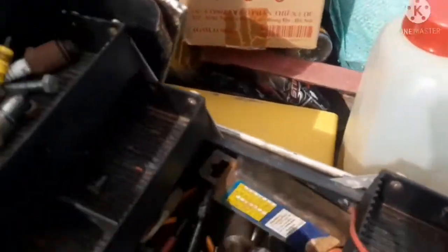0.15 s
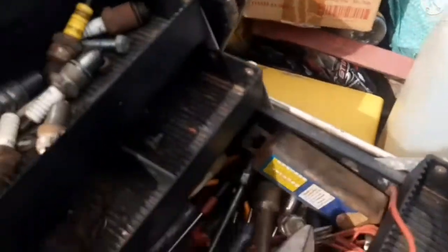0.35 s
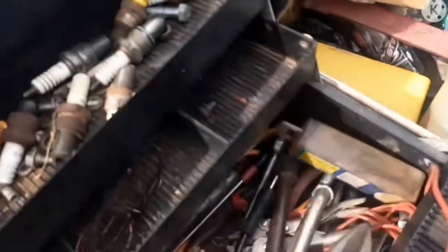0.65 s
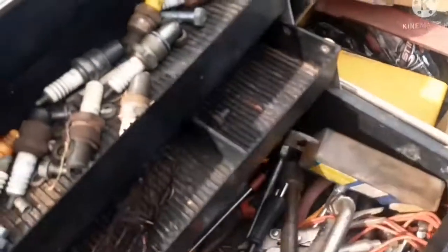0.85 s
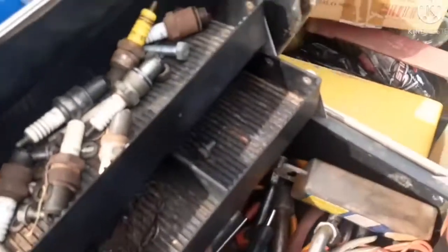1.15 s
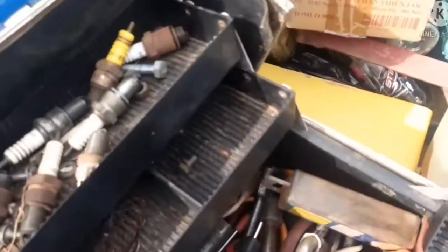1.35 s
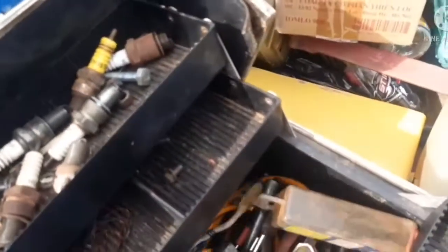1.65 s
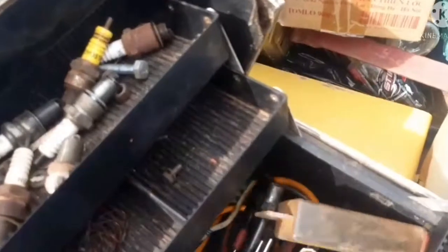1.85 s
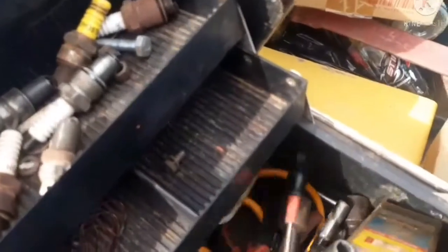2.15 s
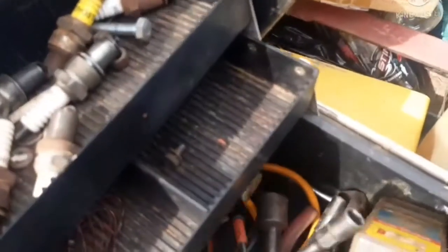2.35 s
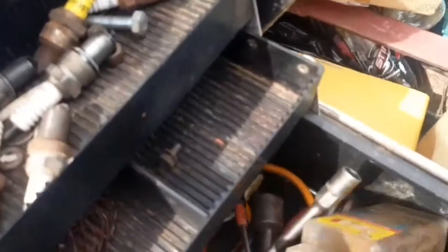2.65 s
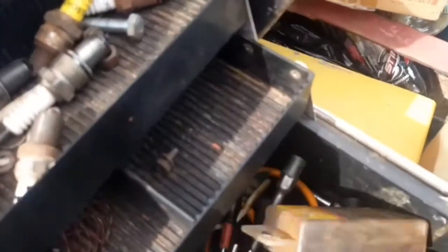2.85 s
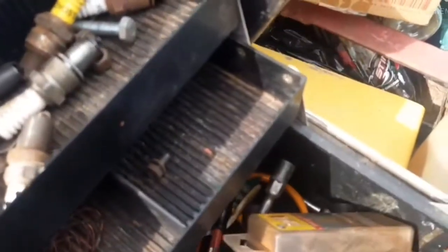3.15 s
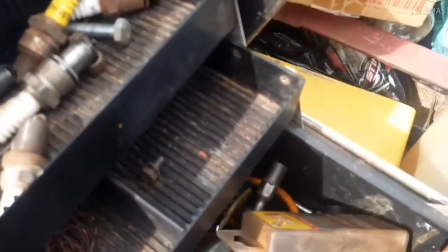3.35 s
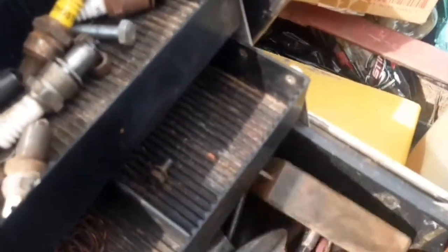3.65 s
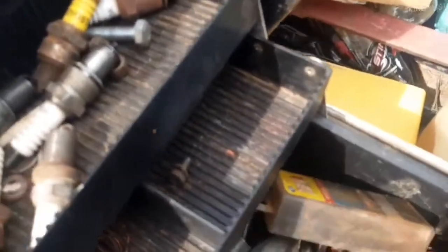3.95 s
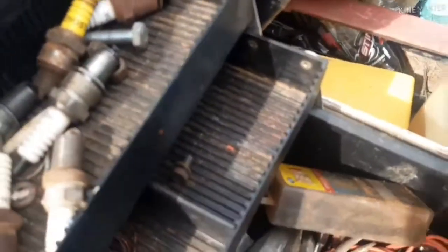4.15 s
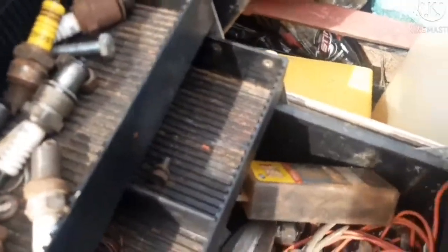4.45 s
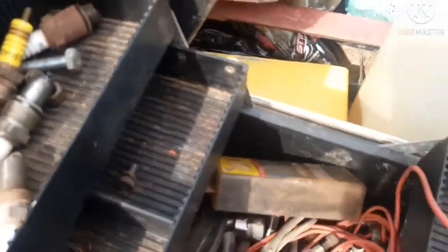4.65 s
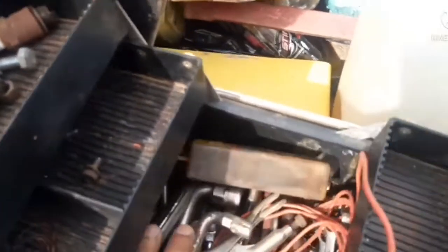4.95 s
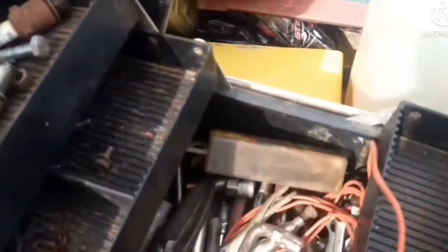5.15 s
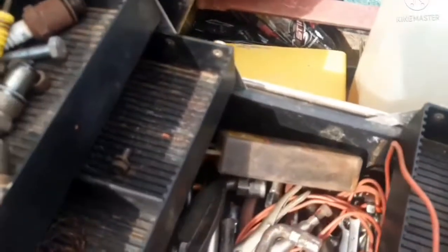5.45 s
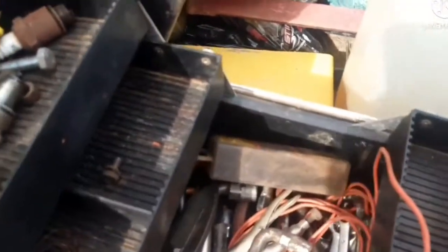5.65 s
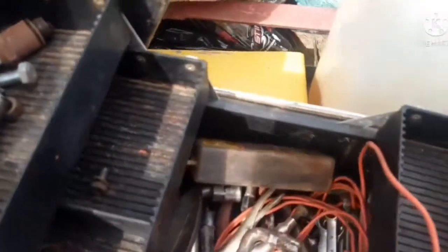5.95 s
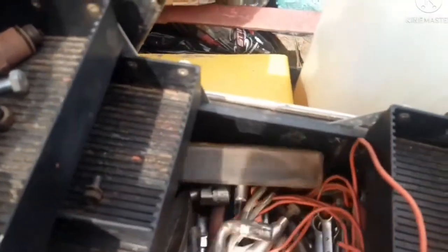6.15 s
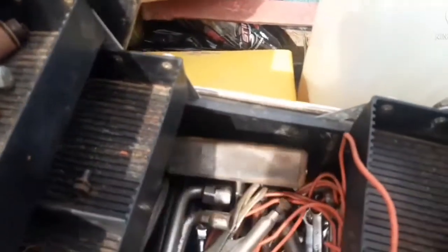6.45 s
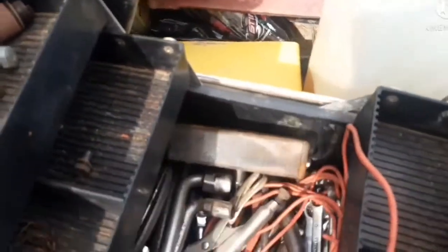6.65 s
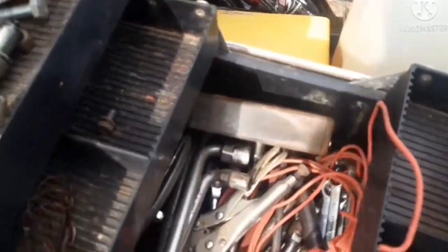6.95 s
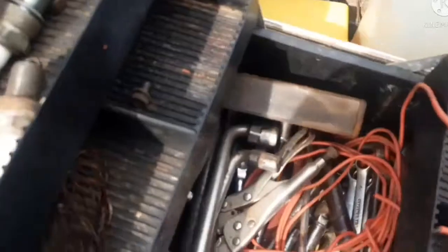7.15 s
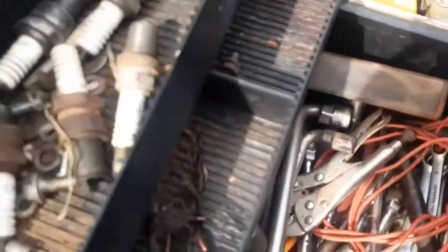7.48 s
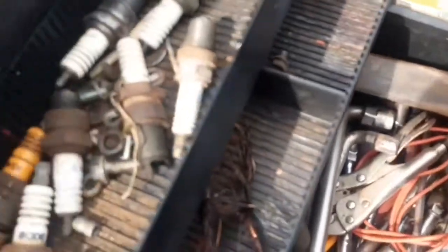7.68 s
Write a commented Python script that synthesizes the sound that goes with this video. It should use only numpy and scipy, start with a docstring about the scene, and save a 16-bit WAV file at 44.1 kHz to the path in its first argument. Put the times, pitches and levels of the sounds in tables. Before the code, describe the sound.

Loose metal tools and small parts are pushed about in a toolbox. Heavy pieces thump and boom the box panels, steel hits steel with sharp, high clinks, a plastic case clops, and a thin rod briefly sings as it drags. Bursts alternate with lighter scraping, ending nearly quiet. Dry, close, wide stereo pickup in open air over a faint low rumble.

```python
"""Steel tools, rummaged by hand in an open toolbox outdoors, clink, knock on the trays and ring on.
Impacts are brief noise bursts exciting damped modes of the steel, the box panels or a plastic case.
Friction is random stick-slip: shoved parts scrape and rattle, and a dragged rod sings in its modes.
The box also jolts with decaying low tones, over a faint far-off rumble of shaped noise.
Each source reaches two close microphone ports with its own random phase pattern."""
import sys
import numpy as np
from scipy import signal
from scipy.fft import rfft, irfft, next_fast_len
from scipy.io import wavfile

SR = 44100
rng = np.random.default_rng(int(sys.argv[2]) if len(sys.argv) > 2 else 0)


def digitize_waveform(pressure):
    """Quantize a signal to 16-bit integers and store it at the path in sys.argv[1].

    Rows of a 2-D input are taken as channels; values are limited to [-1, 1].
    """
    field = np.atleast_2d(pressure).T
    bounded = np.clip(field, -1, 1)
    quanta = np.round(bounded * 32767).astype(np.int16)
    wavfile.write(sys.argv[1], SR, quanta)


N = 344725  # samples

# All levels and weights are relative; the functions add the balance of each source.
# Outdoor background spectrum: (f/Hz, level/dB)
AIR_SPECTRUM = [(20, -29.5), (45, -19.5), (65, -4), (105, 2.5), (350, -13), (1600, -32), (6000, -55.5),
                (9500, -43), (15000, -49.5)]
AIR_DB = -55
# Difference between the ports: (f/Hz, level of side re mid/dB)
PORT_WIDTH = [(45, -3.5), (80, -7.5), (130, -12), (300, -16.5), (700, -4.5), (1400, -2.5), (2800, 0.5),
              (5000, -3), (12000, -1)]
BAND_LIMIT_HZ = 15350

# Modes of the box panels: (f/Hz, bandwidth/Hz, level/dB)
PANEL_MODES = [(199, 38, 2), (256, 38, -2.5), (312, 100, 0), (420, 36, -15)]
# Modes of the larger tools, woken by every hit on the heap: f/Hz
HEAP_MODES_HZ = [2870, 3260, 3763, 4128, 5027, 5600, 6590, 7420, 7880, 8555, 8850, 9930, 11210, 11800,
                 12430, 13280, 14190]
LOW_MODES_HZ = 4000

# Light hand pressure on the heap throughout: (t/s, level of box rumble/dB)
HAND_PRESSURE = [(0, -41.5), (.38, -47.5), (.65, -40.5), (.92, -54), (1.4, -49.5), (2.38, -37), (2.53, -53),
                 (2.75, -42), (3.05, -73), (3.22, -50.5), (4.2, -47.5), (4.95, -41), (5.34, -57),
                 (6.02, -54.5), (6.62, -38.5), (6.95, -53), (7.15, -59.5), (7.8, -78.5)]
LIGHT_SCRAPE_DB, LIGHT_RATTLE_DB = -5, -12.5  # relative to the rumble
# The hand shoves parts along:
# (t/s, length/s, level of box rumble/dB, weight of scraping/dB, weight of steel rattle/dB)
HAND_SHOVES = [(0, 0.028, -30.5, 6, -5), (0.196, 0.097, -34.5, 0.5, -15.5), (0.447, 0.11, -35.5, -2.5, -9),
               (0.544, 0.08, -38, -3, 9), (0.704, 0.089, -32, -7, -8.5), (0.971, 0.14, -37.5, -8.5, -13.5),
               (1.705, 0.11, -30.5, -12.5, -20.5), (1.89, 0.018, -29, -11, -4),
               (2.047, .09, -28.5, -5.5, -3.5), (2.141, 0.12, -26, 5.5, -1), (2.645, 0.2, -39, 0, -9),
               (3.26, .06, -46, -8, -22), (3.407, 0.28, -38, -4, -8.5), (3.54, 0.2, -31, 0, 2),
               (3.988, 0.082, -42.5, -2, 7.5), (4.402, 0.059, -34, -8.5, -9.5),
               (4.526, 0.085, -29, -4.5, 5), (5.095, 0.085, -37, -7.5, 0.5),
               (5.918, 0.057, -49.5, 2.5, -13), (6.077, 0.11, -36.5, -8.5, -12),
               (6.171, 0.41, -28.5, -5, -10.5), (6.322, 0.056, -32.5, -2, 8.5),
               (6.375, 0.076, -20, -0.5, -1), (6.471, 0.038, -40, -3.5, 3), (6.685, 0.058, -39, 2, -5.5),
               (6.817, 0.052, -34, -2.5, -24)]
SHOVE_RISE_S, SHOVE_SAG_DB_PER_S, SHOVE_T60_S = .012, 13.5, .097  # give way, slide, come to rest
SETTLE_DB, SETTLE_T60_S = -17, .27  # the heap shifts after each knock
# Spectrum of scraping faces: (f/Hz, level/dB)
SCRAPE_SPECTRUM = [(300, -26), (480, -1), (750, 6), (1300, -4.5), (2300, -1.5), (3500, -16), (5500, -37),
                   (9000, -38)]
# Spectrum of steel sliding on steel: (f/Hz, level/dB)
RATTLE_SPECTRUM = [(2000, -11), (3900, 5.5), (5600, -4.5), (6800, -3), (8600, 2), (11000, -2.5),
                   (14000, -2.5)]
HOP_S = .013  # sliding contact may move to another part this often

# The whole box jolts on its base: (t/s, level/dB, f/Hz)
BOX_JOLTS = [(0.536, -20.5, 65), (2.226, -25, 80), (3.62, -18, 128), (4.591, -16.5, 80)]
JOLT_T60_S = .092

# A hollow plastic case is bumped: (t/s, level/dB)
CASE_BUMPS = [(.002, -31), (.032, -30), (.764, -21.5), (.779, -25), (2.602, -31), (2.944, -43),
              (4.867, -29.5)]
# Modes of the case: (f/Hz, bandwidth/Hz, level/dB)
CASE_MODES = [(536, 27, -3.5), (646, 120, 2), (755, 75, -2.5), (806, 20, -11), (1260, 15, -26)]
BUMP_T60_S = .042  # main decay of the blow

# A thin rod is dragged over a steel edge: (t/s, length/s, level/dB, weight of low modes/dB)
ROD_SLIDES = [(2.705, 0.0079, -37.5, -10), (2.744, 0.014, -38, -18), (2.797, 0.015, -37, 4),
              (2.871, .03, -57, 12.5), (3.103, 0.055, -61.5, 5.5)]
# Modes of the rod, mostly in close pairs: (f/Hz, level/dB, t60/s)
ROD_MODES = [(3219, -3, .25), (3300, -5, .42), (7776, -7, .3), (7925, -11, .3), (11162, -1, .25),
             (11400, -5, .3), (11668, -3, .3), (11885, -2, .3), (12800, -3, .2), (13250, -5, .25),
             (15020, -1, .1)]
SLIDE_HISS_DB, SLIDE_T60_S = -18, .0468  # the rub itself, and how fast it stops

# Modes of the tools that ring on, by tool: (f/Hz, level/dB, t60/s before the ring-time factor)
TOOL_MODES = { "spanner": [(1432, -18, .15), (4118, -8.5, .38), (5258, -4, .1), (6886, -15, .2),
              (7390, 0, .1), (8540, -5, .14), (10150, -10, .2), (12190, -13, .14)],
              "wrench": [(2870, -7, .25), (4492, -23, .4), (8798, 0, .24), (12430, -21, .17),
              (13290, -17, .17)], "bar": [(2860, 0, 0.23), (4500, -7.5, 0.35)], "pliers": [(2793, -1, .26),
              (3771, -2, .19), (4100, -6, .09), (5022, 3, .14), (8556, -3, .12), (11199, -9, .14),
              (13396, -9, .12)], "bolt": [(5170, -11, 0.17), (5550, 5, 0.12), (7920, -4, 0.087),
              (8800, 6, 0.043)], "socket": [(2020, -2.5, 0.14), (8600, -11, 0.062)],
              "key": [(2454, -9, .07), (3229, -2, .07), (3800, -3, .12), (4492, -6, .08), (6583, -2, .13),
              (7859, 0, .18)], "nut": [(4140, -8, .06), (6155, -3, .1), (7585, 0, .12), (8914, -13, .16),
              (9918, -5, .17)], "ratchet": [(2244, -8, .25), (4139, -4, .15), (5342, -3, .15),
              (6586, 0, .12), (9288, -4, .14), (10825, 0, .14), (12198, 0, .14), (14176, 0, .32)],
              "plug": [(1972, -3, .08), (2473, 0, .08), (3334, -1, .1), (3625, -2, .07), (3814, 0, .09),
              (4134, -1, .1), (4395, -6, .1), (5146, -7, .12), (8554, 1, .08)], "driver": [(2392, -2, .2),
              (2925, -2, .2), (3289, -5, .2), (4411, 1, .5), (5001, -9, .2), (6306, -9, .2),
              (8920, 0, .15)], "pin": [(3500, 1, .08), (7300, -3, .22)], }
# Free swings: (t/s, tool, level/dB, factor on ring time,
# weight of low modes/dB, set by where the tool is struck)
FREE_RINGS = [(.535, "spanner", -15, 0.61, 6), (0.533, "wrench", -22, 0.99, -5),
              (.587, "wrench", -33, 0.39, 3.5), (1.788, "pin", -33.5, 0.76, 0),
              (2.183, "plug", -39, 1.2, 5), (2.212, "wrench", -39, 1.26, 12),
              (2.432, "socket", -22.5, 0.59, -0.5), (3.584, "wrench", -10.5, 0.88, 0),
              (3.647, "driver", -41, 0.51, -9), (3.68, "wrench", -30, 0.92, -4),
              (3.696, "driver", -33, 0.3, 4.5), (3.856, "bar", -38, 0.9, -21), (3.962, "bar", -63, 7.5, 6),
              (4.019, "pliers", -38, 0.64, 0), (4.323, "bolt", -46.5, 1.2, 0), (4.557, "plug", -34, 1.2, 0),
              (4.571, "plug", -38, 0.88, 2), (4.606, "pliers", -52, 0.47, -6), (5.067, "key", -33, 1.7, -2),
              (5.15, "nut", -29, 0.72, 0), (6.319, "pliers", -36, 1.6, 6), (6.43, "ratchet", -30, 1.33, -4),
              (6.46, "plug", -42, 0.85, -14)]

# Parts dropping on the trays: (t/s before a short delay, level/dB, hardness of contact/dB, t60/s)
TRAY_KNOCKS = [(.031, -22.5, 0, 0.15), (0.116, -25, -9.5, 0.015), (0.191, -14, -7, 0.037),
               (0.6, -15, -17, 0.026), (0.681, -26.5, 5, 0.047), (.71, -27.5, 9.5, 0.12),
               (0.762, -13.5, -9.5, 0.059), (0.777, -16.5, -2, 0.066), (1.265, -17.5, -9.5, 0.054),
               (1.542, -15.5, -8, 0.025), (1.594, -21.5, -3.5, 0.03), (1.69, -15.5, -5, 0.02),
               (1.704, -17.5, -1.5, 0.011), (1.795, -17.5, -6.5, 0.033), (1.862, -20.5, -6.5, 0.26),
               (2.017, -16.5, -14, 0.085), (2.089, -25, 10, 0.069), (2.112, -19.5, 3, 0.042),
               (2.128, -16.5, 12, 0.031), (2.153, -21, 3, 0.039), (2.202, -13.5, -2.5, 0.071),
               (2.219, -20, 11, 0.03), (2.238, -23, 5, 0.023), (2.25, -22, 10.5, 0.015),
               (2.6, -16.5, -4, 0.024), (2.732, -29.5, 5.5, 0.029), (2.85, -13, -16, 0.064),
               (2.94, -27.5, 4.5, 0.023), (2.964, -27, -2, 0.097), (3.621, -8, 0.5, 0.032),
               (3.815, -15.5, -8.5, 0.0044), (3.851, -15.5, -11.5, 0.071), (3.955, -16, -13, 0.042),
               (4.059, -17.5, -8.5, 0.14), (4.259, -28, -7, 0.017), (4.321, -25.5, -17, 0.16),
               (4.441, -27, -16.5, 0.053), (4.589, -15.5, -3.5, 0.0066), (4.832, -11, -20.5, 0.017),
               (4.864, -15.5, -1.5, 0.22), (4.942, -22.5, -8, 0.059), (5.089, -15, -9, 0.086),
               (5.199, -25, -11, 0.2), (5.382, -28, -8, 0.032), (5.846, -27.5, -19, 0.028),
               (6.186, -20.5, -25.5, 0.091), (6.303, -14.5, -5.5, 0.088), (6.409, -18, 9, 0.15),
               (6.442, -9.5, -17.5, 0.091), (6.539, -25, 8, 0.044), (7.775, -40.5, -21, .08)]
KNOCK_RISE_S = .0011  # a tray yields before it pushes back
THUMP_DB, CLACK_DB, CRACK_DB = -29, -17, -19  # clack and crack also take the hardness
CRACK_PER_HARDNESS = 1  # dB per dB

# Steel on steel: (t/s before a short delay, level/dB, f of main mode/Hz,
# weight of low clank/dB, weight of top sparkle/dB)
STEEL_CLINKS = [(.042, -22, 9200, -4.5, -16), (0.193, -12, 8500, -14, -12), (0.477, -25.5, 8500, -2.5, -34),
                (0.5344, -12.5, 7500, -31.5, -10.5), (0.59, -17.5, 8600, -10, -10),
                (0.627, -28.5, 6850, 0.5, -12), (1.006, -32, 14000, -9, -16),
                (1.272, -31, 8900, -20, -12.5), (1.5193, -19, 7760, -14, -5.5),
                (1.5389, -15.5, 8500, -9.5, -8.5), (1.594, -29.5, 6660, 0.5, -9),
                (1.704, -27.5, 8100, -10, -13), (1.7754, -28.5, 7700, -2.5, -12),
                (1.862, -13, 11150, -16, -14), (2.0896, -17.5, 7800, -4, -17.5),
                (2.1825, -16.5, 8000, -8, -7), (2.2077, -11, 11200, -14, -11.5),
                (2.2212, -23, 9000, 4.5, -12), (2.2493, -19.5, 12000, 4, -17), (2.35, -28.5, 9070, -6, -11),
                (2.868, -27, 13300, -2.5, -11), (3.495, -11.5, 13900, -15, -12.5),
                (3.5067, -11, 8600, -13.5, -12), (3.644, -8.5, 7600, -16, -10.5),
                (3.723, -20, 8770, -22, -15), (3.8161, -24.5, 8100, -12, -18),
                (3.8562, -18, 8500, -15.5, -8), (3.9612, -20, 8360, -8.5, -14.5),
                (4.0695, -16, 14200, -26, -13), (4.2597, -25, 9400, -6.5, -27),
                (4.3213, -28, 9550, -5, -29.5), (4.4441, -23.5, 12100, 1, -22),
                (4.5554, -14.5, 8670, -7.5, -24.5), (4.589, -9.5, 8500, -21, -15.5),
                (4.622, -15, 7800, -16, -14), (4.832, -21.5, 11000, -11.5, -29),
                (4.892, -8.5, 14000, -16.5, -15.5), (5.09, -12, 9340, -10, -11),
                (5.123, -27.5, 8350, -6.5, -16), (5.2344, -29.5, 7900, -3.5, -13),
                (5.3825, -32, 11130, -25, -12), (6.123, -18, 11100, -5, -8.5),
                (6.1469, -15.5, 7500, -7.5, -14), (6.262, -15.5, 8600, -4, -15.5),
                (6.2976, -8, 11700, -10, -10), (6.316, -5, 9000, -14, -13.5),
                (6.4323, -5.5, 13160, -21, -21), (6.439, -10, 9060, -12.5, -12.5),
                (6.496, -19.5, 10870, -11.5, -25.5), (6.541, -8.5, 11860, -8.5, -28)]
# A part of this pitch rings this long; higher ones die sooner, by this power.
CLINK_T60_S, CLINK_HZ, SMALLER_DIES_FASTER = .07, 8500, .8


def gain_of(db):
    """Level is logarithmic: 20 dB is a tenfold amplitude."""
    return 10 ** (np.asarray(db) / 20)


def evened(x):
    """Equal mean power: scales to rms 1."""
    return x / np.sqrt(np.mean(x ** 2) + 1e-20)


def struck(x):
    """Equal onset power: scales a hit to rms 1 over its first 30 ms."""
    return x / np.sqrt(np.mean(x[:1323] ** 2) + 1e-20)


def read(points, hz):
    """Interpolates a spectrum linearly in dB on a log-frequency axis."""
    f, value = np.transpose(points)
    return np.interp(np.log(hz + 1), np.log(f), value)


def add(mix, s, sound):
    """Superposition: adds a sound of matching channels in place at s seconds."""
    part = mix[:, max(round(s * SR), 0):][:, :sound.shape[1]]
    part += sound[:, :part.shape[1]]


def band(x, lo_hz, hi_hz, order=3):
    """Causal Butterworth band-pass."""
    sos = signal.butter(order, [lo_hz, min(hi_hz, .49 * SR)], "band", fs=SR, output="sos")
    return signal.sosfilt(sos, x)


def colour(x, points):
    """Zero-phase filtering: multiplies the spectrum by a level curve."""
    size = next_fast_len(len(x))
    gain = gain_of(read(points, np.fft.rfftfreq(size, 1 / SR)))
    return irfft(rfft(x, size) * gain, size)[:len(x)]


def wander(size, per_s):
    """Random modulation: straight lines between normal random knots, per_s of them a second."""
    knots = rng.standard_normal(N // 100)
    return np.interp(np.arange(size) * per_s / SR, np.arange(len(knots)), knots)


def contact(t, t60, after_db, after_t60):
    """Double decay: a noise burst of tiny impacts dies fast, then the neighbours chatter."""
    decay = gain_of(-60 * t / t60) + gain_of(after_db - 60 * t / after_t60)
    return rng.standard_normal(len(t)) * decay


def resonate(x, modes):
    """Modal excitation: resonators in parallel, weighted at random by the point of contact."""
    out = 0
    for hz, width, db in modes:
        weight = gain_of(db) * (.5 + rng.random())
        out = out + weight * signal.lfilter(*signal.iirpeak(hz, hz / width, SR), x)
    return out


def steel(t60, heap_db, heap_t60, count=40):
    """Modal sum: one blow rings a small part's dense modes and those of the tools it lies on."""
    t = np.arange(SR // 4) / SR
    hz = np.concatenate([rng.uniform(1700, 15500, count), HEAP_MODES_HZ])
    own = np.arange(len(hz)) < count
    height = rng.standard_normal(len(hz)) * np.where(own, 1, gain_of(heap_db))
    life = np.where(own, t60, heap_t60) * (.5 + rng.random(len(hz)))
    decay = np.exp(-np.log(1000) * t / life[:, None])
    return height @ (decay * np.sin(2 * np.pi * hz[:, None] * t))


def ports(x, spread=1.19):
    """Interchannel phase: reflections in the box give each spot its own pattern at the two ports."""
    size = next_fast_len(len(x))
    hz = np.fft.rfftfreq(size, 1 / SR)
    phase = spread * np.interp(np.sqrt(hz) / 2, np.arange(80), rng.standard_normal(size=80))
    shift = gain_of(read(PORT_WIDTH, hz)) * np.exp(1j * phase)
    side = irfft(rfft(x, size) * shift, size)[:len(x)]
    return np.array([x - side, x + side])


def outdoors(count=3):
    """Diffuse field: independent shaped noises sum in power to a faint far-off rumble."""
    air = sum(ports(evened(colour(rng.standard_normal(N), AIR_SPECTRUM))) for _ in range(count))
    return gain_of(AIR_DB) * air / np.sqrt(count)


def stirring():
    """Power addition: pressure, settling and shoves set the rumble, scrape and rattle envelopes."""
    t = np.arange(N) / SR
    light = gain_of([[0], [LIGHT_SCRAPE_DB], [LIGHT_RATTLE_DB]])
    power = (light * gain_of(np.interp(t, *np.transpose(HAND_PRESSURE)))) ** 2
    age = t[:SR // 2]
    for s, knock_db, *_ in TRAY_KNOCKS:
        settling = gain_of(knock_db + SETTLE_DB - 60 * age / SETTLE_T60_S)
        add(power, s, (light * settling) ** 2)
    for s, length, db, scrape_db, rattle_db in HAND_SHOVES:
        fade_db = SHOVE_SAG_DB_PER_S * age + 60 * np.maximum(age - length, 0) / SHOVE_T60_S
        push = np.minimum(age / SHOVE_RISE_S, 1) * gain_of(db - fade_db)
        add(power, s, (gain_of([[0], [scrape_db], [rattle_db]]) * push) ** 2)
    return np.sqrt(power)


def slips(per_s, spread_db, hiss_db):
    """Stick-slip friction: random impulses of very uneven size over a smooth rub."""
    size = gain_of(spread_db * np.minimum(rng.exponential(1, N), 2.5)) * rng.choice([-1, 1], N)
    impulses = size * (rng.random(N) < per_s / SR)
    return evened(impulses) + gain_of(hiss_db) * rng.standard_normal(N)


def jangle(drive, count=4):
    """Switched modal response: contact hops among parts, so the rattle keeps changing pitch."""
    hop = (np.arange(N) / SR / HOP_S).astype(int)
    touched = rng.integers(count, size=N)[hop]
    out = 0
    for k in range(count):
        blow = np.pad(steel(.07, heap_db=-6, heap_t60=.09), 40)
        out = out + signal.oaconvolve(drive * (touched == k), colour(blow, RATTLE_SPECTRUM))[:N]
    return out


def rummage(count=4):
    """Friction-driven vibration: slips at a few spots drive the box, scraping faces and steel in fits."""
    rumble, scrape, rattle = stirring()
    fits = gain_of(5 * np.tanh(wander(N, per_s=45)))
    t = np.arange(SR // 20) / SR
    out = np.zeros((2, N))
    for _ in range(count):
        drive = fits * slips(per_s=50, spread_db=4, hiss_db=-8)
        box = evened(band(resonate(drive, PANEL_MODES), 130, 550, order=2))
        box += gain_of(-10.5) * evened(band(drive, 99, 135, order=2))
        tail = rng.standard_normal(len(t)) * gain_of(-60 * t / .05)
        faces = colour(signal.oaconvolve(drive, tail)[:N], SCRAPE_SPECTRUM)
        parts = jangle(drive)
        spot = gain_of(-1) * rumble * evened(box)
        spot += gain_of(-3) * scrape * evened(faces)
        spot += gain_of(-7) * rattle * evened(parts)
        out += ports(spot)
    return out / np.sqrt(count)


def jolt(db, hz):
    """Damped oscillation: the whole box rocks on its base with a short deep thud."""
    t = np.arange(SR // 3) / SR
    thud = gain_of(db - 60 * t / JOLT_T60_S) * np.sin(2 * np.pi * hz * t)
    return band(thud, 48, 900, order=2)


def bump(db):
    """Impact excitation: a short blow makes the plastic case clop in its few low modes."""
    t = np.arange(SR // 4) / SR
    blow = contact(t, BUMP_T60_S, after_db=-25.5, after_t60=.19)
    return gain_of(db) * struck(band(resonate(blow, CASE_MODES), 480, 1170, order=2))


def slide(length, db, low_db):
    """Forced resonance: gritty friction feeds the rod's modes; each swells and fades on its own."""
    t = np.arange(SR * 2 // 3) / SR
    stop_db = 60 * np.maximum(t - length, 0) / SLIDE_T60_S
    grit_db = 2.93 * wander(len(t), per_s=260)
    rub = rng.standard_normal(len(t)) * gain_of(grit_db - stop_db)
    sound = gain_of(SLIDE_HISS_DB) * struck(band(rub, 8100, 15000, order=1))
    for hz, mode_db, t60 in ROD_MODES:
        q = hz * t60 * np.pi / np.log(1000)
        mode = signal.lfilter(*signal.iirpeak(hz, q, SR), rub)
        swell_db = 4 * wander(len(t), per_s=76)
        level_db = mode_db + low_db * (hz < LOW_MODES_HZ) + swell_db
        sound += gain_of(level_db) * mode / abs(mode).max()
    return gain_of(db) * sound


def ring(tool, db, hold, low_db):
    """Free vibration: a swinging tool rings in its modes; grazing its neighbours re-excites them."""
    t = np.arange(SR * 3 // 4) / SR
    sound = np.zeros(len(t))
    for hz, mode_db, t60 in TOOL_MODES[tool]:
        flutter_db = 4.5 * np.minimum(t / .05, 1) * wander(len(t), per_s=58)
        level_db = mode_db + low_db * (hz < LOW_MODES_HZ) - 60 * t / (t60 * hold) + flutter_db
        sound += gain_of(level_db) * np.sin(2 * np.pi * hz * t)
    neighbour = gain_of(-19) * struck(steel(.05, heap_db=-6, heap_t60=.04))
    sound[:len(neighbour)] += neighbour
    touches = rng.random(len(t)) < 150 / SR
    grazes = gain_of(-18) * rng.standard_normal(len(t)) * touches * np.exp(-t / .025)
    grazes[0] = 1  # the blow itself
    damping = gain_of(-40 * np.maximum(t - .22, 0) / .12)  # it settles and is damped
    return gain_of(db) * signal.fftconvolve(grazes, sound)[:len(t)] * damping


def knock(level_db, hard_db, t60):
    """Contact stiffness: a heavy part thumps the box and booms its panels; hardness adds clack and crack."""
    t = np.arange(SR // 3) / SR
    blow = contact(t, t60, after_db=-26, after_t60=.22) * (1 - np.exp(-t / KNOCK_RISE_S))
    panels = struck(resonate(blow, PANEL_MODES)) + gain_of(9) * struck(band(blow, 170, 520))
    boom = gain_of(-13.5) * struck(band(panels, 190, 390, order=2))
    thump = gain_of(THUMP_DB) * struck(band(blow, 55, 150, order=2))
    clack = gain_of(CLACK_DB + hard_db) * struck(band(blow, 572, 912))
    crack = gain_of(CRACK_DB + CRACK_PER_HARDNESS * hard_db) * struck(band(blow, 1200, 2990))
    return gain_of(level_db) * (boom + thump + clack + crack)


def clink(level_db, hz, low_db, top_db):
    """Hard impact: a tick rings the heap and the part's main mode; the contact tilts the spectrum."""
    t = np.arange(SR // 4) / SR
    t60 = CLINK_T60_S * (CLINK_HZ / hz) ** SMALLER_DIES_FASTER
    tick = struck(contact(t, t60 * .5, after_db=-27.5, after_t60=.15))
    modes = struck(steel(t60 * .55, heap_db=-7, heap_t60=.068))
    metal = modes + .45 * tick
    main_mode = gain_of(-24) * struck(np.sin(2 * np.pi * hz * t) * gain_of(-60 * t / t60))
    clank = gain_of(low_db - 13.5) * struck(band(metal, 1400, 4200))
    body = gain_of(-21) * struck(band(metal, 6780, 11000))
    sparkle = gain_of(top_db - 8.5) * struck(band(metal, 10500, 13000))
    bite = 1 - np.exp(-t / .00022)  # the faces take an instant to meet
    return gain_of(level_db) * bite * (clank + body + sparkle + main_mode)


def scene():
    """Linear superposition: all hits over the rummaging and the open air."""
    mix = outdoors() + rummage()
    for s, *hit in BOX_JOLTS:
        add(mix, s, ports(jolt(*hit)))
    for s, db in CASE_BUMPS:
        add(mix, s, ports(bump(db)))
    for s, *drag in ROD_SLIDES:
        add(mix, s, ports(slide(*drag)))
    for s, *hit in FREE_RINGS:
        add(mix, s, ports(ring(*hit)))
    for s, *hit in TRAY_KNOCKS:
        add(mix, s + .001982, ports(knock(*hit)))  # each knock sounds about 2 ms after its listed time
    for s, *hit in STEEL_CLINKS:
        add(mix, s + .0012, ports(clink(*hit)))
    return mix


def record(dry):
    """Soft limiting and band limiting: the hardest peaks are rounded off, then a low-pass follows."""
    rounded = dry / (1 + (dry / .9) ** 6) ** (1 / 6)
    low_pass = signal.firwin(101, BAND_LIMIT_HZ, window=("kaiser", 9), fs=SR)
    return signal.oaconvolve(rounded, low_pass[None], "same")


dry = scene()
out = record(dry)
digitize_waveform(out)
```